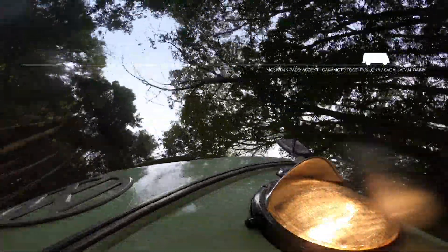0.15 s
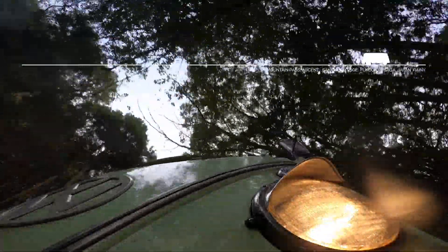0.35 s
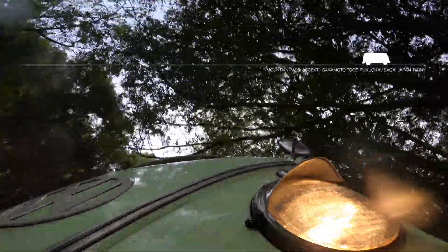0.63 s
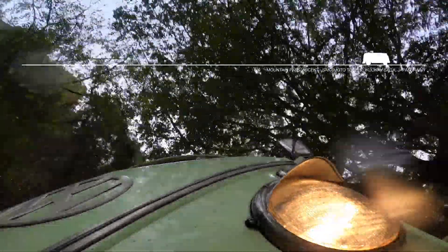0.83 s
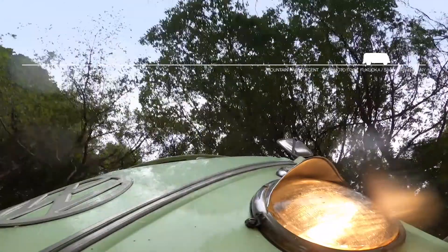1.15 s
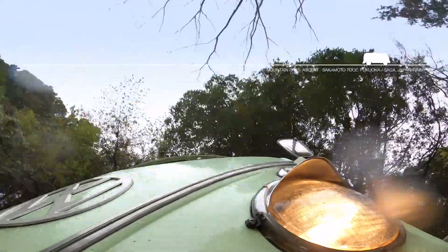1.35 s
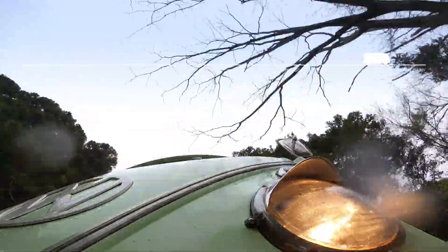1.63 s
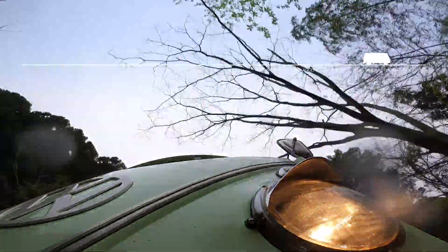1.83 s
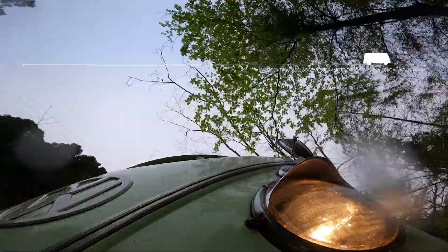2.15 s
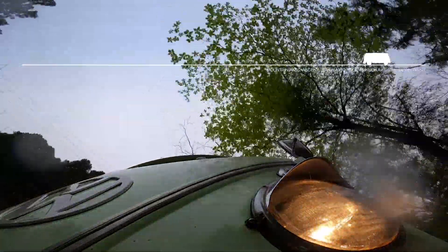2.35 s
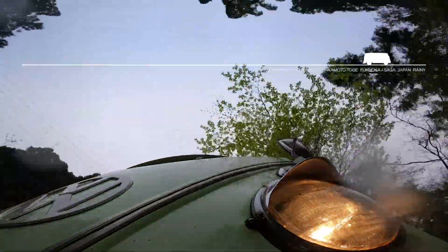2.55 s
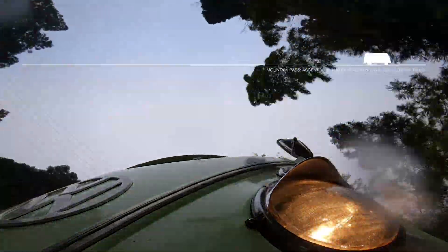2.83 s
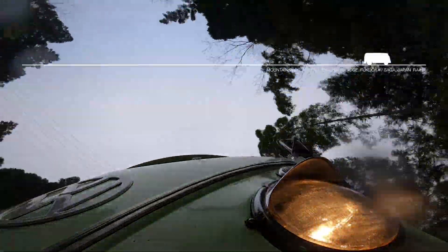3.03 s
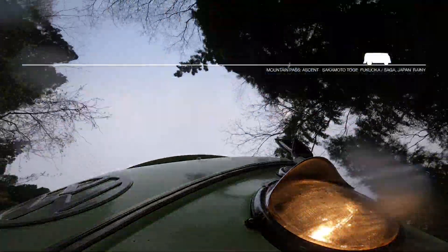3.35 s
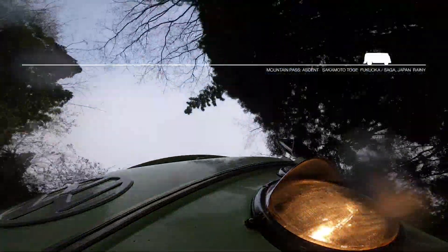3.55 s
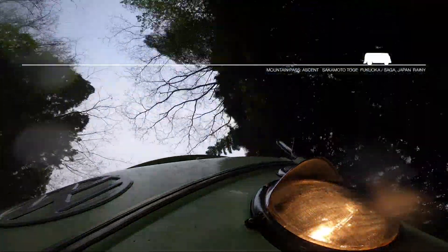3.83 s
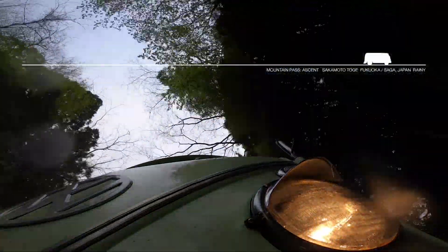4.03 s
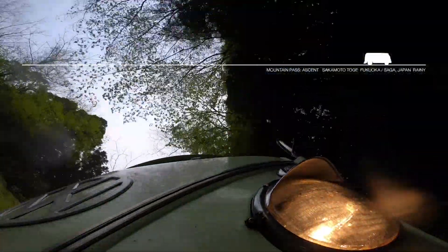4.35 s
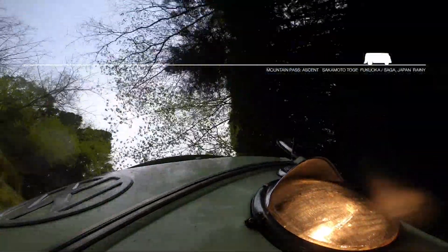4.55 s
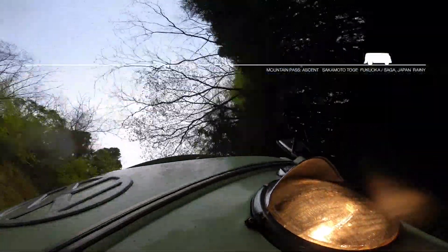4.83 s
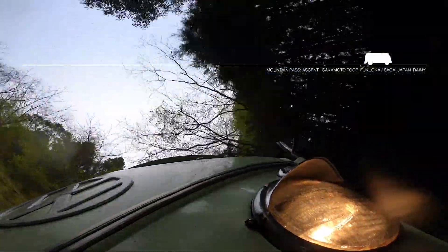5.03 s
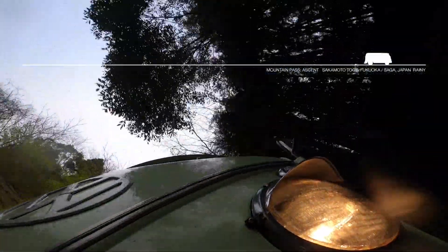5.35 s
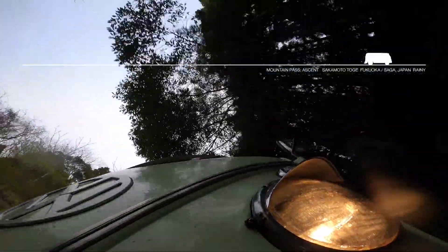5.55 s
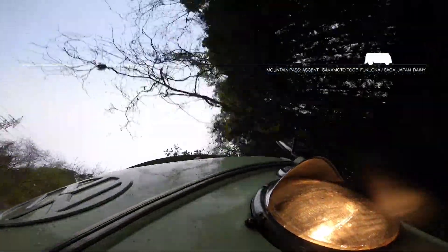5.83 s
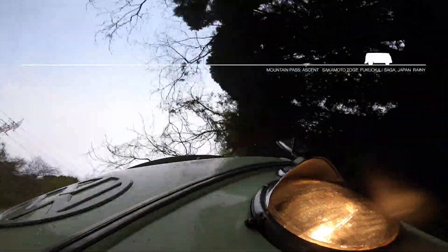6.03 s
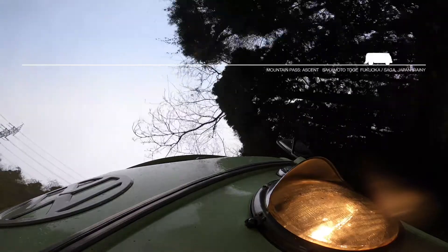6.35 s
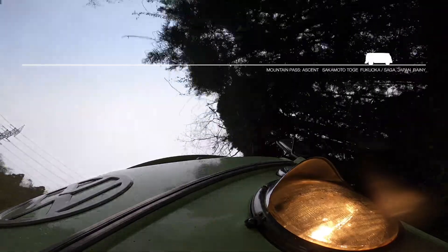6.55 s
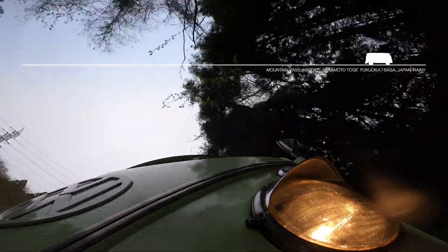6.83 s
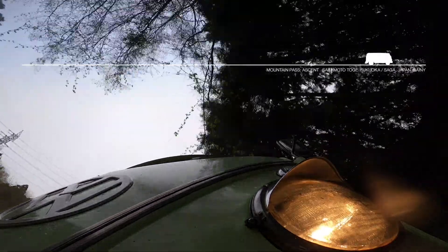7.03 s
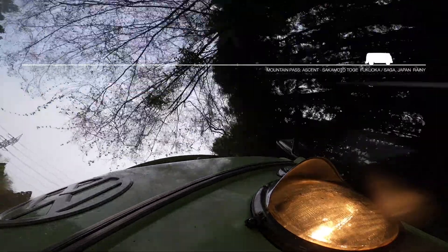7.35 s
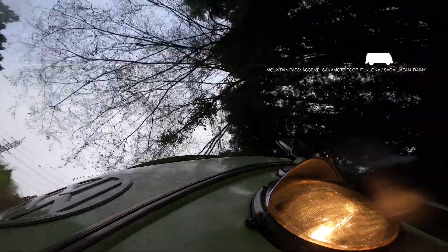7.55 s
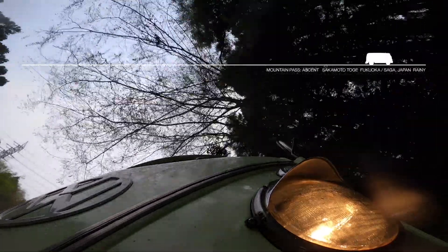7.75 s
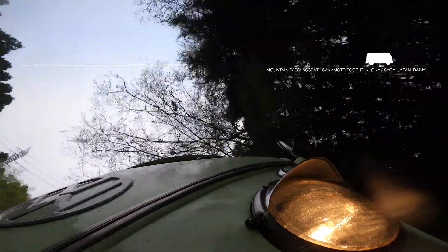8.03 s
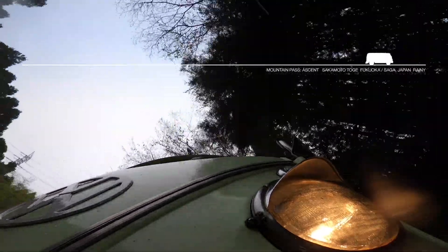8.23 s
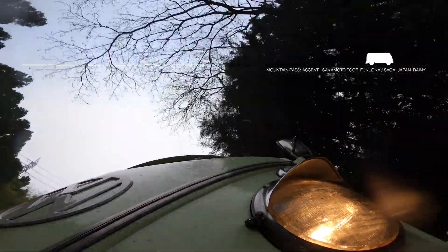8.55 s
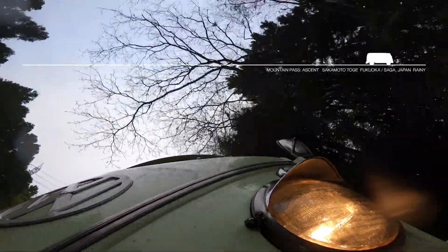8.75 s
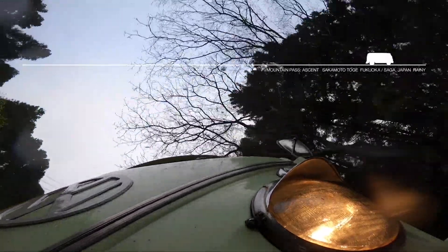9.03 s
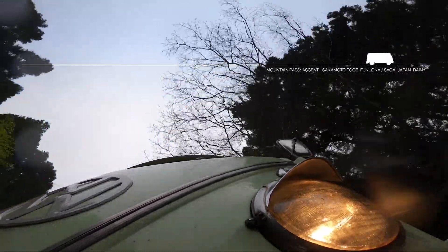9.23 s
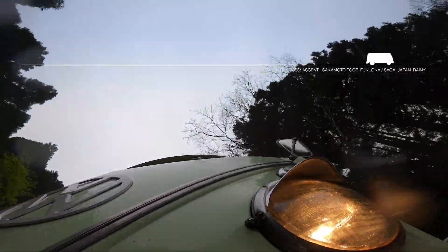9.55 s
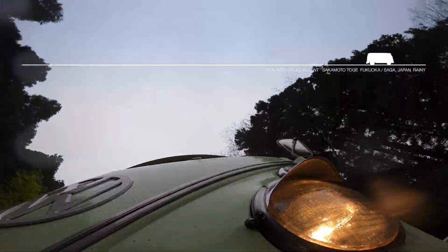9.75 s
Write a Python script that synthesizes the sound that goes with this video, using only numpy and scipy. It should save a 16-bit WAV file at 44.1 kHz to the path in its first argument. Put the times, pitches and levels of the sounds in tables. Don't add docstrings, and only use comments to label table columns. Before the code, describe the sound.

Mono, close inside the front of an old bus on a wooded hill road. A deep engine drone falls quickly, steadies and climbs under load, rough and hissy, then lets go with a double clunk and heavy thuds from the road. The pitch slides down until single firings are felt as fluttering, uneven puffs and pipe knocks. Tinware rattles and small ticks scatter over soft fan and tyre roar to the end.

```python
import sys
import numpy as np
from scipy import signal
from scipy.io import wavfile

SR = 44100
rng = np.random.default_rng(int(sys.argv[2]) if len(sys.argv) > 2 else 0)


def bounce(signal):
    frames = np.transpose(np.atleast_2d(signal))
    limited = np.clip(frames, -1, 1)
    pcm = np.round(limited * 32767).astype(np.int16)
    wavfile.write(sys.argv[1], SR, pcm)


def decibels_to_gain(level_db):
    exponent = np.asarray(level_db, float) / 20
    return 10 ** exponent


N = 435692


def in_time(rows):
    s, *columns = np.transpose(rows)
    return [np.interp(np.arange(N) / SR, s, c) for c in columns]


def rms_one(x):
    return x / np.sqrt(np.mean(x ** 2) + 1e-20)


def at_hz(points, hz):
    point_hz, db = np.transpose(points)
    return np.interp(np.log(hz), np.log(point_hz), db)


def drift(rate):
    r = np.exp(-80 * np.pi * rate / SR)
    slow = signal.lfilter([1], [1, -2 * r, r * r], rng.standard_normal(N // 40 + 2002))[2000:]
    return np.interp(np.arange(N) / 40, np.arange(len(slow)), rms_one(slow))


def resonance(x, hz, width_hz):
    r = np.exp(-np.pi * width_hz / SR)
    zeros = np.array([1, 0, -1]) * (1 - r * r) / 2
    poles = [1, -2 * r * np.cos(2 * np.pi * hz / SR), r * r]
    return signal.lfilter(zeros, poles, x + 1e-18)


def double_resonance(x, hz, width_hz):
    return resonance(resonance(x, hz, width_hz), hz, width_hz)


def swell(clicks, rise_s, fall_s):
    a, b = np.exp(-1 / (rise_s * SR)), np.exp(-1 / (fall_s * SR))
    return signal.lfilter([1 - a], np.convolve([1, -a], [1, -b]), clicks + 1e-18)


def band_pass(x, low, high):
    return signal.sosfilt(signal.butter(2, [low, high], "band", fs=SR, output="sos"), x)


def bands(low_hz):
    edges = low_hz * 2 ** np.arange(0, np.log2(19000 / low_hz), 1 / 3)
    white = rng.standard_normal((2, N))
    for k, (low, high) in enumerate(zip(edges, edges[1:])):
        yield np.sqrt(low * high), band_pass(white[k % 2], low, high)


PULLING_DB = [-4, 2, 5, 0]


def firings(turns, uneven, uneven_db, late):
    at = np.flatnonzero(np.diff(np.floor(turns)) > 0)
    cylinder = np.floor(turns[at + 1]).astype(int) % 4
    u = np.clip(uneven[at], 0, 1)
    delay = u * np.take(late, cylinder) / (turns[at + 1] - turns[at])
    db = u * np.take(uneven_db, cylinder) + (1 - u) * np.take(PULLING_DB, cylinder)
    return np.minimum(at + delay.astype(int), N - 1), db


def strikes(at, db, scatter_db):
    clicks = np.zeros(N)
    clicks[at] = decibels_to_gain(db + scatter_db * rng.uniform(-1, 1, 600)[:len(at)])
    return clicks


def rumble():
    white = rng.standard_normal(N) * decibels_to_gain(2.5 * drift(6))
    return rms_one(band_pass(white, 16, 55)), rms_one(double_resonance(white, 66, 24))


# (time [s], whistle [Hz], whistle level [dB], shroud howl level [dB])
WHISTLE = [(0, 2020, -35, -37), (.1, 1940, -36, -35), (.22, 1870, -41, -37), (.35, 1760, -48, -39),
           (.5, 1700, -60, -34), (.65, 1700, -80, -40), (1, 1700, -90, -46), (9.88, 1700, -90, -70)]


def whistle():
    hz, db, howl_db = in_time(WHISTLE)
    phase = 2 * np.pi * np.cumsum(hz + 10 * drift(30)) / SR
    tone = decibels_to_gain(db + 2.5 * drift(25)) * np.sin(phase)
    howl = rms_one(double_resonance(rng.standard_normal(N), 903, 140))
    return tone + decibels_to_gain(howl_db) * howl


# (time [s], low thud [dB], body ring [dB], knock [dB])
BUMPS = [(0.023, -14, -36, -37), (0.154, -13, -28, -30), (0.519, -21, -34, -17), (1.278, -26, -33, -30),
         (1.549, -33, -20, -30), (1.8, -15, -12, -20), (2.071, -27, -17, -8), (2.31, -28, -29, -18),
         (2.85, -11, -19, -24), (2.968, -19, -31, -32), (3.13, -25, -6, -12), (3.722, -22, -11, -13),
         (4.182, -30, -25, -11), (4.621, -16, -12, -21), (5.432, -41, -12.5, -33), (5.93, -39, -12, -41),
         (6.247, -38, -12.5, -32), (6.77, -37, -13, -26), (7.228, -16, -24, -26), (8.0, -36, -19, -28),
         (8.52, -30, -13, -22), (9.35, -37, -25, -17), (9.688, -32, -10, -15)]
# (frequency [Hz], width [Hz])
BODY = [
    (32, 6.1),
    (66, 16),
    (170, 104),
]


def bumps():
    out = np.zeros(N)
    at = [round(row[0] * SR) for row in BUMPS]
    for k, (hz, width_hz) in enumerate(BODY):
        clicks = np.zeros(N)
        clicks[at] = decibels_to_gain(np.array(BUMPS)[:, k + 1]) * SR / (2 * np.pi * width_hz)
        out += resonance(resonance(clicks, hz, 4 * width_hz), hz, width_hz) * 1.82
    return out


# (time [s], level [dB])
CLUNKS = [
    (0.512, -13),
    (1.835, -15),
    (1.86, -20),
]


def clunks():
    ring_hz, width_hz = 239, 49
    clicks = np.zeros(N)
    for s, db in CLUNKS:
        clicks[round(s * SR)] = decibels_to_gain(db) * SR * np.e / (2 * np.pi * width_hz)
    return double_resonance(clicks, ring_hz, width_hz)


# (place in the cycle [firings], level [dB])
VALVES = [(.72, 0), (1.22, -1.5), (2.48, -4), (3.12, 2), (3.5, -1)]


def valves(turns, uneven):
    level_db, tick_hz = -51, 5000
    clicks = np.zeros(N)
    for place, db in VALVES:
        at = np.flatnonzero(np.diff(np.floor((turns - place) / 4)) > 0)
        clicks += strikes(at, db, scatter_db=5.0)
    ticks = swell(clicks, .002, 0.0027) * rng.standard_normal(N)
    ring = resonance(ticks, tick_hz, 3100) + 1.3 * resonance(ticks, tick_hz, 350)
    return decibels_to_gain(level_db) * uneven * rms_one(ring)


# (time [s], high ring peak [dB], middle ring [dB], low ring [dB])
RATTLES = [(3.5231, -27, -31, -27), (3.6233, -31, -36, -30), (3.727, -24, -34, -29),
           (3.9421, -35, -34, -31), (4.1691, -27, -30, -30), (4.2878, -35, -32, -27),
           (4.6495, -31, -32, -31), (4.7707, -31, -42, -33), (4.8321, -30, -34, -28),
           (4.8939, -25, -36, -36), (4.955, -33, -41, -35), (5.0182, -28, -37, -28),
           (5.1409, -38, -31, -36), (5.3918, -38, -33, -38), (5.4522, -31, -31, -44),
           (5.6377, -26, -29, -29), (5.766, -31, -36, -33), (5.887, -29, -41, -31), (6.0123, -37, -46, -42),
           (6.4526, -31, -41, -32), (6.646, -31, -31, -38), (6.7752, -33, -36, -35),
           (6.9056, -39, -40, -31), (7.0366, -41, -39, -39), (7.304, -35, -31, -30),
           (7.4354, -34, -34, -32), (7.5677, -30, -34, -42), (7.7023, -36, -31, -37),
           (7.7689, -32, -30, -41), (7.8323, -37, -32, -38), (8.0996, -28, -34, -30),
           (8.2355, -38, -32, -32), (8.372, -35, -41, -32), (8.509, -40, -40, -38),
           (8.5781, -25.5, -41, -31), (8.65, -33, -28, -35), (8.7861, -41, -40, -41),
           (8.8564, -28, -33, -39), (8.9298, -32, -29, -35), (9.0694, -33, -42, -38),
           (9.1421, -27, -33, -27), (9.2156, -32, -44, -29), (9.287, -32, -40, -41), (9.36, -28, -44, -39),
           (9.4321, -36, -45, -38), (9.506, -39, -46, -34), (9.6521, -26, -31, -36),
           (9.7948, -37, -29, -31)]
# (time [s], high ring peak [dB], middle ring [dB], low ring [dB])
RATTLES_PULLING = [(0.0668, -27, -30, -31), (0.175, -25, -29, -31), (0.2289, -26, -27, -35),
                   (0.3437, -25, -34, -33), (0.402, -35, -34, -37), (0.4669, -38, -35, -42),
                   (0.5253, -32, -26, -32), (0.551, -28, -31, -32), (0.63, -29, -30, -36),
                   (0.6774, -24, -34, -28), (0.7403, -27, -32, -36), (0.7757, -30, -42, -42),
                   (0.866, -33, -36, -41), (0.8979, -33, -38, -39), (0.943, -22, -40, -39),
                   (1.0825, -28, -32, -42), (1.1249, -34, -31, -38), (1.1758, -33, -38, -40),
                   (1.3045, -29, -36, -37), (1.3628, -29, -35, -40), (1.5554, -23, -33, -36),
                   (1.5958, -26, -31, -36), (1.6966, -30, -33, -31), (1.784, -31, -34, -31),
                   (1.8408, -37, -36, -36), (1.9026, -35, -39, -40), (1.9625, -28, -35, -37),
                   (2.0214, -27, -31, -35), (2.2079, -29, -36, -34), (2.5631, -35, -36, -34),
                   (2.7218, -29, -32, -32), (2.8041, -29, -25, -31), (2.969, -25, -34, -32),
                   (3.0605, -28, -38, -39), (3.148, -29, -31, -30), (3.2396, -29, -36, -32)]
# (at idle [Hz], pulling [Hz], width at idle [Hz], width pulling [Hz], level [dB])
RATTLE_RINGS = [
    (3846, 4250, 130, 270, -6),
    (2585, 2750, 140, 230, -1.5),
    (1300, 1750, 160, 360, -0.5),
]


def rattles():
    lead_s = .003
    out = np.zeros(N)
    for pulling, table in enumerate((RATTLES, RATTLES_PULLING)):
        rows = np.array(table)
        for k, ring in enumerate(RATTLE_RINGS):
            luck = rng.uniform(-1, 1, (len(rows), 6))
            for j, detune in enumerate((.96, 1.04)):
                touch_s = (.004 * j + .0015 * luck[:, j]) / (1 + pulling)
                at = ((rows[:, 0] - lead_s * (1 - pulling) + touch_s) * SR).astype(int)
                strength = decibels_to_gain(rows[:, k + 1] + ring[4] + 2 * luck[:, j + 2])
                clicks = np.zeros(N + SR)
                clicks[at] = strength * np.sign(luck[:, j + 4])
                hz, width_hz = detune * ring[pulling], ring[2 + pulling]
                peak_one = SR * np.e / (2 * np.pi * width_hz)
                out += double_resonance(clicks[:N], hz, width_hz) * peak_one
    return out


# (frequency [Hz], level per Hz [dB])
PUFF = [(90, -29), (250, 7), (450, -39), (650, -8.5), (1000, -26), (2000, -10.5), (3400, -11),
        (5000, -13.5), (8000, -15.5), (12000, -19), (15500, -29)]
# (frequency [Hz], level per Hz [dB])
ROAR = [(60, -30), (90, -20), (200, -9), (320, -18), (400, -11.5), (450, -12.5), (520, -26), (640, -25),
        (940, -21.5), (1650, -26.5), (2830, -33), (3400, -36.5), (5000, -37), (8000, -47), (15500, -52)]
# (frequency [Hz], width [Hz], level under puffs [dB], level under the fan [dB])
TIN = [(940, 240, -8, -11), (1280, 170, -9, -20), (1780, 110, -14, -20), (2550, 160, -11, -22),
       (2850, 280, -17, -19), (3850, 400, -10, -26), (5000, 400, -19, -30), (6600, 500, -16, -40),
       (8000, 700, -13, -42)]
PUFF_LATE = [0.083, 0.4, 0.026, 0.48]


def air(turns, load, uneven, second_db, puff_db, roar_db):
    lead = turns + 0.33 + .5 * load
    at, db = firings(lead, uneven * (1 - 0.62 * load), [7, -22, 9, -6], PUFF_LATE)
    second_best = lead[at] % 4 < 1
    db = db + 2 * rng.uniform(-1, 1, 600)[:len(at)] + second_db[at] * second_best
    patches = [1 + 0.11 * drift(3.0) + 0.12 * drift(12) for k in range(5)]
    before_weak = (.5 + .5 * np.cos(np.pi * (turns - .88))) ** 14
    hush = 1 - .55 * np.clip(uneven, 0, 1) * before_weak
    hiss, roar = 0, 0
    for k, (hz, noise) in enumerate(bands(87.8)):
        noise = noise * hush if hz > 2500 else noise
        blows = swell(strikes(at, db, scatter_db=3.0), .0065, .0066)
        hiss = hiss + decibels_to_gain(at_hz(PUFF, hz)) * noise * blows
        roar = roar + decibels_to_gain(at_hz(ROAR, hz)) * noise * patches[k % 5]
    hiss, roar = rms_one(hiss), rms_one(roar)
    for hz, width_hz, blown_db, fan_db in TIN:
        noise = resonance(rng.standard_normal(N), hz, width_hz)
        blows = swell(strikes(at, 1.3 * db, scatter_db=4.0), .005, .005)
        blown = rms_one(resonance(noise * blows, hz, width_hz))
        hiss = hiss + decibels_to_gain(blown_db - 5 * load - 5 * (1 - uneven)) * blown
        roar = roar + decibels_to_gain(fan_db) * rms_one(noise)
    shut = (.5 + .5 * np.cos(2 * np.pi * (turns - .12))) ** 2
    puffs = decibels_to_gain(puff_db - 2.5) * hiss * (1 - (0.17 + 0.24 * load) * shut)
    return puffs + decibels_to_gain(roar_db + 5.5) * roar * (1 - 0.45 * load * shut)


# (frequency [Hz], width [Hz], level [dB])
PIPE = [(130, 15, -27), (179, 34, -37), (212.2, 41, 3.5), (251, 122, -1.5), (368.2, 21, -1),
        (415.5, 57, -6)]
# (time [s], lead [firings])
KNOCK_LEAD = [(0, .25), (.58, .55), (1.8, .55), (2.15, .26), (2.7, .18), (3.1, .12), (3.9, .13), (4.6, .18),
              (7, .18), (7.6, .15), (9.88, .15)]
KNOCK_LATE = [0, .1, 0, .1]


def pipe(turns, load, uneven):
    at, db = firings(turns + in_time(KNOCK_LEAD)[0], uneven, [1, -10.5, -1.5, -8], KNOCK_LATE)
    knocks = -strikes(at, db, scatter_db=3.0)
    gas = swell(strikes(at, db, scatter_db=-9.5), 0.0015, 0.022) * rng.standard_normal(N)
    drive = rms_one(knocks) + 0.5 * rms_one(gas)
    ring = np.zeros(N)
    for k, (hz, width_hz, level_db) in enumerate(PIPE):
        ring += decibels_to_gain(level_db) * (-1) ** k * double_resonance(drive, hz, width_hz)
    thump = double_resonance(knocks * uneven ** 2, 136, 150)
    return rms_one(ring), rms_one(thump)


# (frequency [Hz], level [dB])
CABIN = [(27, -24.5), (40, -16.5), (50, -5), (62, 0.5), (70, -3), (80, -11.5), (110, -19), (170, -19)]
# (multiple of the firing rate, level at the body's peak [dB], gain when pulling [dB],
# share of the body's colour, share of a surge)
BOOM_ORDERS = [(1, -9.5, 1.5, 0.46, -0.1), (1.5, -15, -7, 1.37, 0.089), (2, -18.5, 16, 1.055, 0.71),
               (2.5, -19.5, -2.5, 0.81, -1)]
BOOM_LAG = [(0, 0), (.24, .5), (.29, .38), (.59, .8)]
# (time [s], level [dB])
SURGES = [(4.21, -2.5), (4.7, 7), (5.09, 7.5), (5.44, 3.5), (5.95, 4), (6.44, 7.5), (6.8, 6), (7.26, 9),
          (7.69, 7), (8.04, 6), (8.5, 8), (8.86, 4), (9.28, 5), (9.71, 5.5)]
# (multiple of the firing rate, lag [turns], coasting level [dB], pulling level [dB])
WEAK = [(.5, -.2, -38, -35), (.75, -.42, -42, -40), (1.25, -.1, -44, -45), (2.25, .13, -34, -44),
        (3, -.4, -42, -24), (3.5, .21, -50, -38), (4, .19, -48, -28), (5, -.4, -55, -43),
        (5.5, .06, -60, -41), (6, .14, -60, -41), (6.5, .5, -44, -60)]
# (time [s], level [dB])
ROCKING = [(0, -45), (2, -40), (2.3, -27), (3.2, -25), (4, -38), (4.6, -60), (9.88, -60)]


def boom(turns, rate, load):
    out, t = np.zeros(N), np.arange(N) / SR
    surge_s, waver_db, revs_db = 0.053, 0.32, 2
    surge_db = sum(db * np.exp(-.5 * ((t - s) / surge_s) ** 2) for s, db in SURGES)
    for (order, db, pull_db, colour, surges), (coast, pull) in zip(BOOM_ORDERS, BOOM_LAG):
        db = db + pull_db * load + colour * at_hz(CABIN, order * rate) + surges * surge_db
        db = db + waver_db * (order - .5) * drift(7.0)
        if order == 1:
            db = db + revs_db * np.log2(rate / 62)
        lag = coast + load * (pull - coast)
        out += decibels_to_gain(db) * np.cos(2 * np.pi * (order * turns - lag))
    for order, lag, coast_db, pull_db in WEAK:
        db = coast_db + load * (pull_db - coast_db) + 1.5 * (1 - .7 * load) * drift(3)
        out += decibels_to_gain(db) * np.cos(2 * np.pi * (order * turns - lag))
    out += decibels_to_gain(in_time(ROCKING)[0]) * np.cos(np.pi * turns - .9)
    return np.sqrt(2) * out


# (time [s], firing rate [1/s])
SPEED = [(0.0, 80.96), (0.29, 69.34), (0.52, 64.09), (0.77, 63.43), (1.2, 66.97), (1.77, 70.42),
         (2.02, 67.16), (2.52, 53.09), (2.88, 47.05), (3.9, 36.3), (4.32, 33.61), (4.6, 32.72),
         (6.43, 31.64), (7.15, 29.92), (7.85, 30.32), (8.16, 29.62), (9.55, 27.19), (9.88, 27.84)]
# (time [s], load [0-1], unevenness of the cylinders [0-1], second-best cylinder's puff [dB])
THROTTLE = [(0, 0.34, 0.3, 4), (.3, 0.62, 0.06, 16), (.5, 0.77, 0, -2), (.58, 1, 0.44, 6.5),
            (1.8, 0.94, 0.14, 4.5), (1.87, 0.56, 0.36, -2), (2.03, 0.65, 0.6, 8), (2.15, 0.26, 0.64, -4),
            (2.4, 0.12, 0.4, -1), (3, 0.15, 0.33, 7), (4.5, 0.11, 0.81, -0.5), (5.4, 0.07, 0.69, 2.5),
            (5.7, 0.14, 0.89, 2), (6.3, 0, 0.81, -2), (7, 0.04, 1.03, 0), (9.88, 0.08, 1.3, -0.5)]
# (time [s], level [dB])
GEAR = [(0, 1.5), (.15, 0), (.48, -0.5), (.6, 1), (1.75, 2), (2.07, -1), (2.4, 0), (2.8, 0.5), (3.1, 1.5),
        (3.75, 0.5), (4.4, -1), (5.7, -2), (7.3, -3), (8.5, -3.5), (9.88, -4)]


def scene():
    rate, = in_time(SPEED)
    turns = np.cumsum(rate) / SR + .1
    load, uneven, second_db = in_time(THROTTLE)
    gear_db, = in_time(GEAR)
    pipe_db = -24.5 + 3.35 * gear_db - 10.5 * load
    puff_db = -39 + 0.19 * gear_db + 3.9 * load
    roar_db = -32 + 1.15 * gear_db - 0.89 * load
    rumble_db = -21 + 0.24 * gear_db + 0.69 * load

    low, body = rumble()
    wind = decibels_to_gain(rumble_db - 4 * uneven) * low + decibels_to_gain(-32) * body
    ring, thump = pipe(turns, load, uneven)
    exhaust = decibels_to_gain(pipe_db) * (decibels_to_gain(-2.5) * ring + decibels_to_gain(2) * thump)
    engine = boom(turns, rate, load) + exhaust + air(turns, load, uneven, second_db, puff_db, roar_db)
    mechanics = whistle() + clunks() + rattles() + valves(turns, uneven)
    return (engine + wind + bumps() + mechanics)[None]


def roll_off(x):
    return signal.sosfilt(signal.butter(12, 15780, fs=SR, output="sos"), x)


def record(dry):
    duck_s, duck_db, attack_s, recover_s = 2.085, -2, 0.0041, 0.63
    since = np.arange(N) / SR - duck_s
    recovery = np.exp(-np.maximum(since, 0) / recover_s)
    ducked = dry * decibels_to_gain(duck_db * np.clip(since / attack_s, 0, 1) * recovery)
    rounded = 1.8 * np.tanh(ducked / 1.8)
    mix = signal.sosfilt(signal.cheby2(16, 60, 15900, fs=SR, output="sos"), rounded)
    return roll_off(mix)


dry = scene()
out = record(dry)
bounce(out)
```